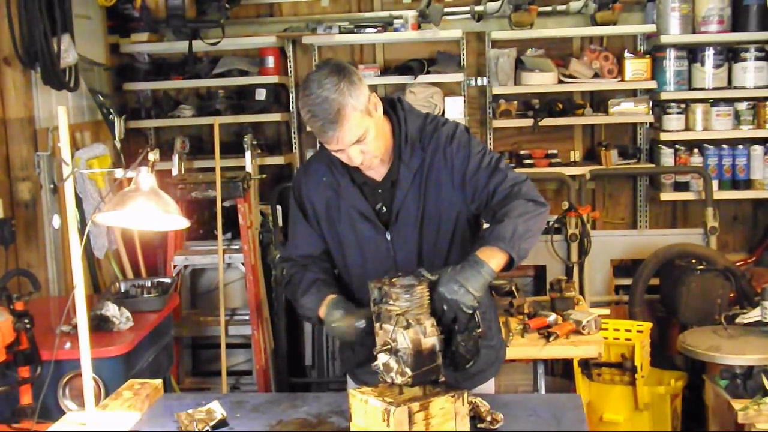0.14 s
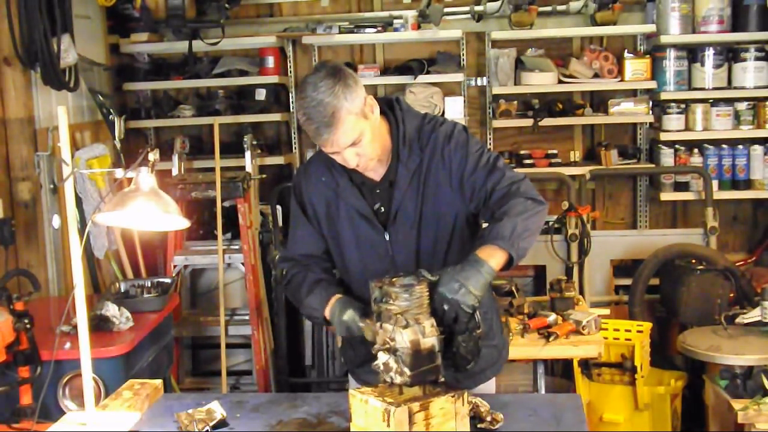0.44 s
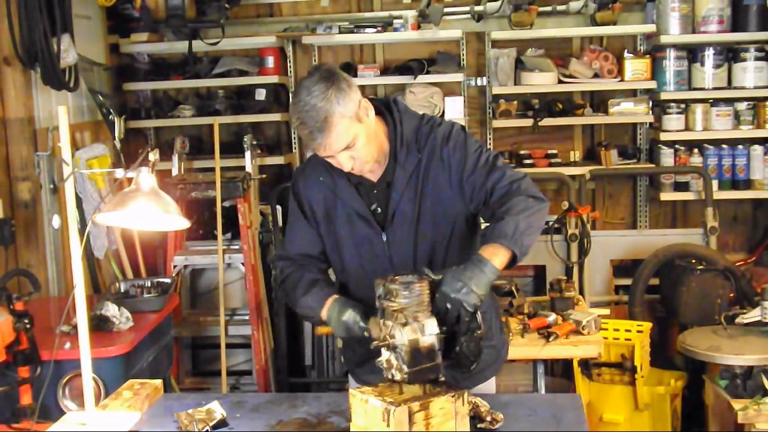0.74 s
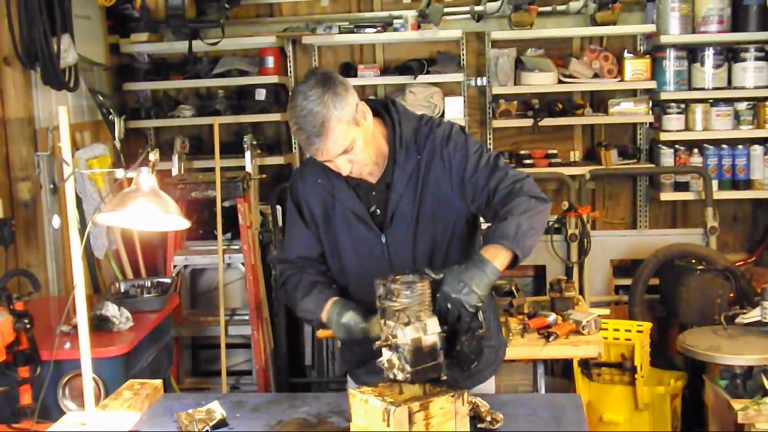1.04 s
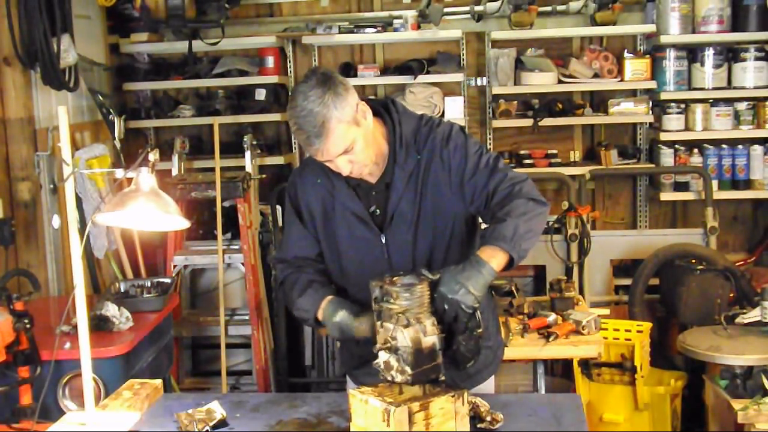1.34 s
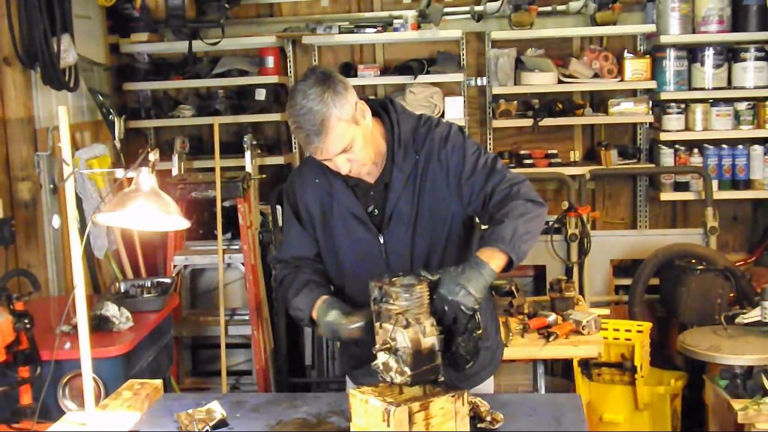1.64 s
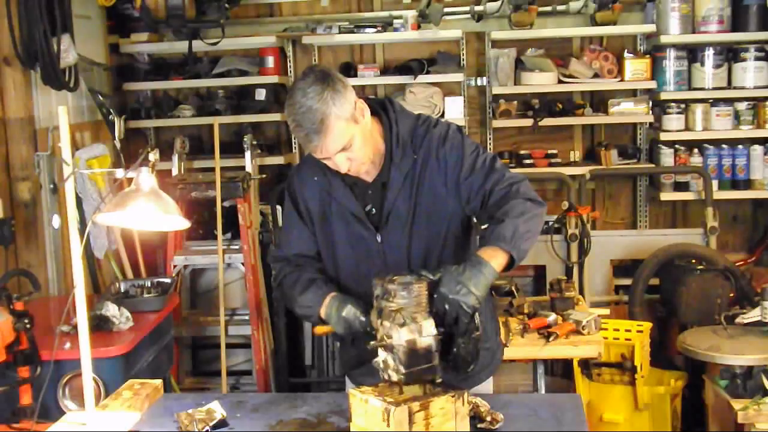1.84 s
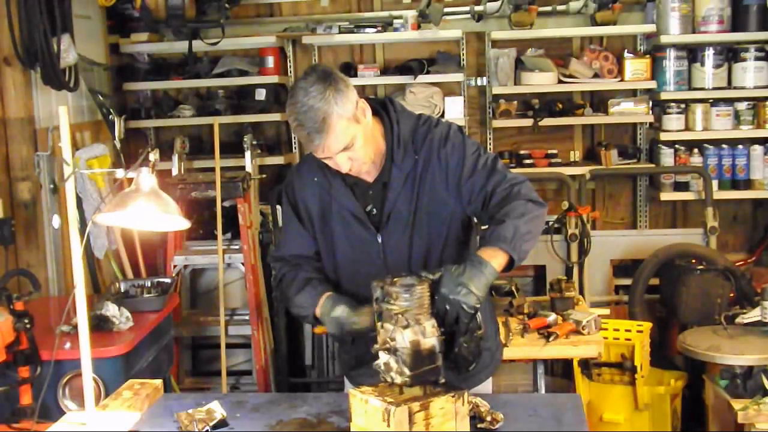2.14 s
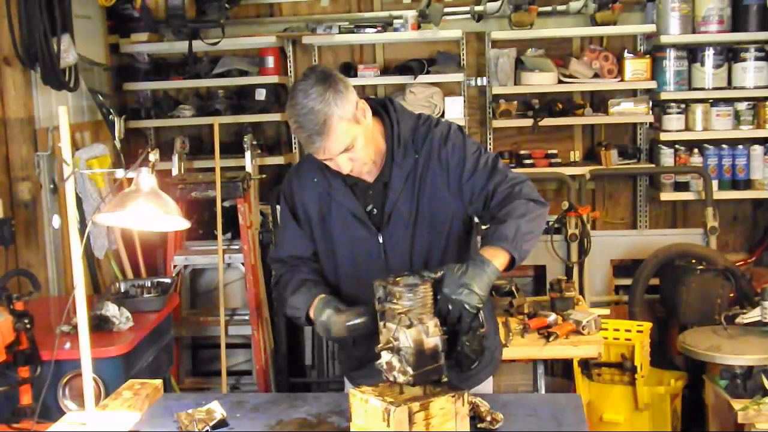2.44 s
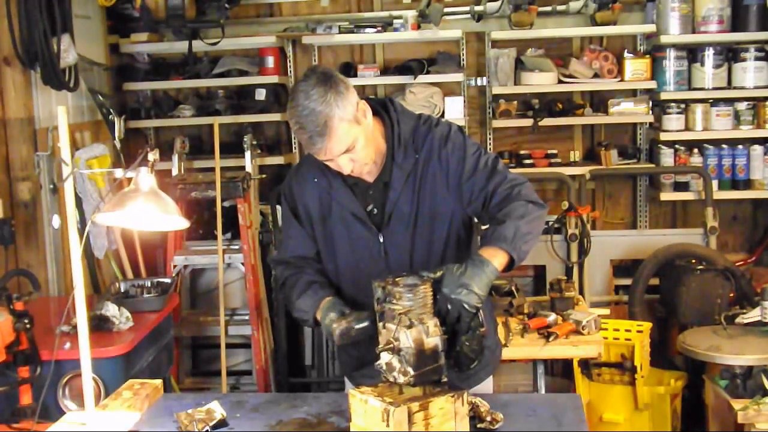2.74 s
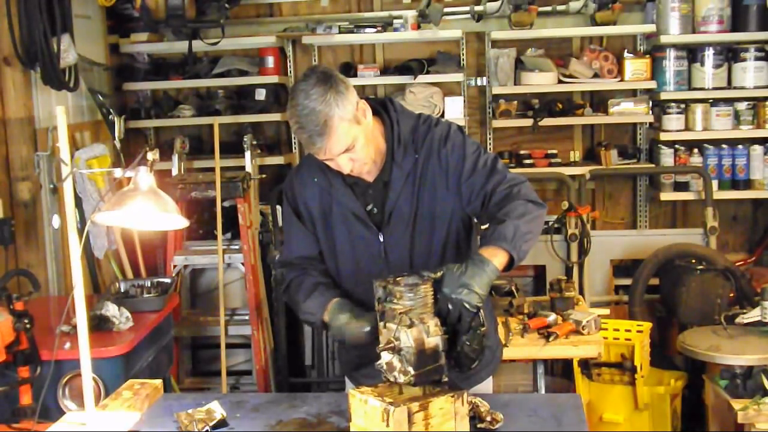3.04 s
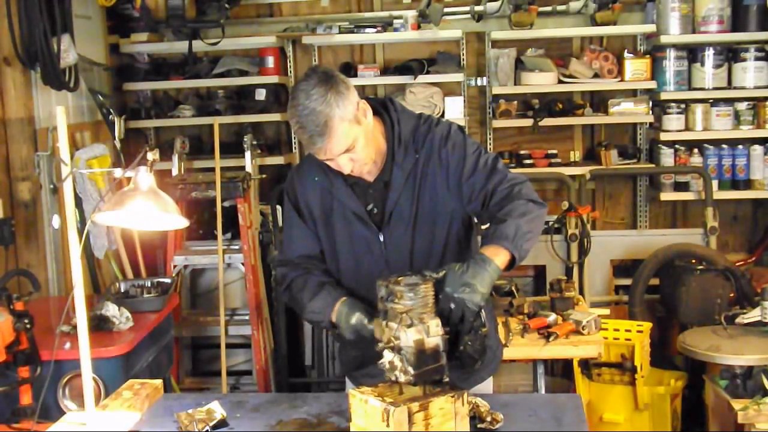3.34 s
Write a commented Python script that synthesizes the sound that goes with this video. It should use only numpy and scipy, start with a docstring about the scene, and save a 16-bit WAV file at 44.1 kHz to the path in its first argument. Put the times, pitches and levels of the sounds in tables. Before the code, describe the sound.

A rubber mallet strikes a cast engine block thirteen times at an even, rapid pace, each a short damped clonk with bench thump, in a cluttered workshop, heard by a slightly overloaded, narrow-band microphone.

```python
"""A rubber mallet knocks thirteen times, evenly, on a cast engine block held in a gloved hand on a wooden block.
Each blow sums short, damped sine modes into a clonk, with a burst of noise for the metal chatter.
Slower low noise is the workbench thump, and fainter bumps are the block rocking back onto its support.
A cluttered workshop answers with near echoes, a diffuse noise tail and lingering tones, over quiet room noise.
The loudest blows just overload the microphone, and the recorder keeps a narrow band."""
import sys
import numpy as np
from scipy import signal
from scipy.fft import rfft, irfft, next_fast_len
from scipy.io import wavfile

SR = 44100
rng = np.random.default_rng(int(sys.argv[2]) if len(sys.argv) > 2 else 0)


def int16_out(signal):
    """Quantize to a 16-bit WAV file."""
    q = np.round(np.clip(np.atleast_2d(signal).T, -1, 1) * 32767)
    wavfile.write(sys.argv[1], SR, q.astype(np.int16))


N = 154350


def amp(db):
    """Decibels to linear gain."""
    return 10 ** (np.asarray(db) / 20)


def along(points, hz):
    """Read (Hz, value) points at any frequency, on a log frequency axis."""
    point_hz, value = np.transpose(points)
    return np.interp(np.log(hz + 1), np.log(point_hz + 1), value)


def filtered(x, response):
    """Multiply the spectrum of x by a response of frequency, padded so that short echoes do not wrap round."""
    size = next_fast_len(len(x) + 4096, True)
    hz = np.fft.rfftfreq(size, 1 / SR)
    return irfft(rfft(x, size) * response(hz), size)[:len(x)]


def tilt(hz, bright_db):
    """Gain sloping by bright_db per octave from 600 Hz to 2400 Hz, level beyond; lower values sound duller."""
    octaves = np.log2(np.clip(hz / 600, 1, 4))
    return amp(bright_db * octaves)


def coloured(white, spectrum, bright_db=0):
    """White noise given a spectrum at the same power, then tilted."""
    every_hz = np.arange(SR // 2)
    norm = np.sqrt(np.mean(amp(along(spectrum, every_hz)) ** 2))
    return filtered(white, lambda hz: amp(along(spectrum, hz)) * tilt(hz, bright_db) / norm)


def noise(t):
    """White noise as long as t."""
    return rng.standard_normal(len(t))


def fade(t, t60):
    """Exponential decay that falls 60 dB in t60 seconds."""
    return np.exp(-np.log(1000) * t / t60)


def rise(t, rise_s):
    """Exponential approach to full level."""
    return 1 - np.exp(-t / rise_s)


def add(out, start_s, sound):
    """Mix a sound in at a time, cut off at the end of out."""
    i = round(start_s * SR)
    out[i:i + len(sound)] += sound[:max(len(out) - i, 0)]


def casting(t, bright_db, pitch):
    """The block's hand-damped modes, struck nearly alike each time, then again by the small bounces."""
    # Modes of the block. Each row: frequency in Hz at pitch ratio 1, relative level in dB, t60 in s.
    block_modes = [(349, -25.5, 0.082), (450, -15.5, 0.04), (585.2, 1.5, 0.029), (767, -4, 0.029),
                   (914.6, -16.5, 0.099), (948, -14, 0.072), (1112.4, -1, 0.021), (1243, -12, 0.032),
                   (1700, -11, 0.043), (1865, -13, 0.018), (1980, -29, 0.022), (2330, -20.5, .032),
                   (2615, -17.5, 0.023), (4514, -30, 0.021), (5620, -26.5, 0.0095)]
    # The part bounces in its seat. Each row: delay after the contact in s, level in dB.
    bounces = [(.00263, -6), (.00456, -15)]
    level_db, mode_scatter_db, contact_s = 3, 1.2, 0.0012
    bounce_scatter_s, bounce_above_hz = .00005, 1700

    hz, db, t60 = np.transpose(block_modes)[:, :, None]
    scatter_db = mode_scatter_db * rng.standard_normal(hz.shape)
    gain = amp(db + level_db + scatter_db) * tilt(hz, bright_db)
    modes = gain * fade(t, t60) * np.sin(2 * np.pi * hz * pitch * t)
    out = modes.sum(0) * rise(t, contact_s)
    # the bounces ring mainly the upper modes
    upper = np.sum(modes / (1 + (bounce_above_hz / hz) ** 4), 0)
    for delay_s, bounce_db in bounces:
        scattered_s = abs(delay_s + bounce_scatter_s * rng.standard_normal())
        add(out, scattered_s, amp(bounce_db) * upper)
    return out


def chatter(t, bright_db):
    """Metal grates on metal at the contact: coloured noise held a few milliseconds, then dying away."""
    # Spectrum of the grating crack. Each row: frequency in Hz, relative level in dB.
    crack = [(300, -33.5), (700, -12), (1300, 0), (2000, -0.5), (2750, -2.5), (3200, -6), (4500, -3.5),
             (6800, -11.5), (9000, -25.5)]
    level_db, rise_s, hold_s, t60_s = -23.5, 0.0039, 0.0041, 0.045
    shape = rise(t, rise_s) * fade(np.maximum(t - hold_s, 0), t60_s)
    return amp(level_db) * shape * coloured(noise(t), crack, bright_db)


def shelves(x):
    """A sound followed by its first echoes, each a delayed, weaker copy."""
    # Echoes from the bench top and near shelves. Each row: delay in s, level in dB.
    reflections = [(.0098, -32.5), (0.0159, -14.5), (0.0356, -28.5), (0.0537, -26)]

    def response(hz):
        return 1 + sum(amp(db) * np.exp(-2j * np.pi * hz * delay_s) for delay_s, db in reflections)
    return filtered(x, response)


def bench(t):
    """The bench takes the blow and rumbles: mostly low noise with a fast rise and a slow decay."""
    # Spectrum of the workbench. Each row: frequency in Hz, relative level in dB.
    rumble = [(20, -22.5), (35, -17), (48, 3), (65, 2), (80, -5), (105, -1), (150, -2), (190, -15),
              (255, -9.5), (400, -22), (900, -47.5), (2500, -100)]
    level_db, rise_s, t60_s = -28.5, 0.0028, 0.67
    return amp(level_db) * rise(t, rise_s) * fade(t, t60_s) * coloured(noise(t), rumble)


def rock(t):
    """A dull bump as the block settles: mostly low noise that rises fast and decays."""
    # Spectrum of the bump. Each row: frequency in Hz, relative level in dB.
    bump = [(30, -11), (50, 2), (80, -7.5), (150, -4), (200, -13.5), (300, -5.5), (550, -14.5),
            (800, -23.5), (1500, -27.5), (3000, -45.5), (7000, -82.5)]
    rise_s, t60_s = 0.005, .35
    return rise(t, rise_s) * fade(t, t60_s) * coloured(noise(t), bump)


def workshop(t, paths, bright_db):
    """A diffuse tail and lingering tones; the echo paths partly change from blow to blow."""
    # The workshop's answer. Each row: frequency in Hz, relative level in dB.
    answer = [(80, -23.5), (190, -14.5), (260, -2), (400, -5.5), (490, 1), (590, 3), (720, -3.5),
              (1000, -3), (1250, -11), (1700, -10.5), (2200, -19), (2700, -16.5), (3200, -27.5),
              (4500, -27), (5200, -31), (6800, -34.5)]
    # Its decay. Each row: frequency in Hz, t60 in s.
    decay = [(100, .8), (300, .66), (600, .52), (1200, .46), (2500, .45), (6500, .44)]
    # Tones that linger in bench, block and room. Each row: frequency in Hz, relative level in dB, t60 in s.
    tones = [(45.54, -34, 2.1), (67, -35, 1.5), (145.9, -39, 1.7), (560, -27, 0.47), (622.5, -27, 0.35),
             (898, -34.5, 0.26), (1318, -38.5, 0.5), (4470, -57.5, 0.35)]
    tail_db, rise_s = -18, .008
    change = .25  # share of the echo power that is new at each blow

    mixed_paths = np.sqrt(1 - change) * paths + np.sqrt(change) * noise(t)
    echoes = coloured(mixed_paths, answer, bright_db)
    # each frequency band decays at its own rate
    hz, frame_s, bands = signal.stft(echoes, SR, nperseg=512)
    decayed = bands * fade(frame_s, along(decay, hz)[:, None])
    tail = signal.istft(decayed, SR, nperseg=512)[1][:len(t)]
    standing = sum(amp(db) * fade(t, t60) * np.sin(2 * np.pi * (tone_hz * t + rng.random()))
                   for tone_hz, db, t60 in tones)
    return (amp(tail_db) * tail + standing) * (1 - np.exp(-(t / rise_s) ** 2))


def background(t):
    """Steady coloured noise of the quiet workshop, with more of the same fading away at the start."""
    # Spectrum of the background. Each row: frequency in Hz, relative level in dB.
    hush = [(20, -13), (33, -10), (60, 0), (150, -4), (550, -6), (1000, -18), (3000, -37), (7000, -44)]
    floor_db, linger_db, linger_t60_s = -48.5, -40.5, 0.48
    out = amp(floor_db) * coloured(rng.standard_normal(N), hush)
    add(out, 0, amp(linger_db) * fade(t, linger_t60_s) * coloured(noise(t), hush))
    return out


def scene():
    """The blows and the rocking block over the quiet of the workshop."""
    # Mallet blows. Each row: start in s, strength in dB, brightness in dB per octave, pitch ratio,
    # bench thump in dB.
    blows = [(0.1252, -3.5, -2, 0.97, 1.5), (0.3821, -5, -5, 0.97, -6), (0.6566, -1, -1.5, 1, 3),
             (0.9135, -1.5, -2.5, 0.98, 4.5), (1.181, 0.06, -3, 1, 1.5), (1.4419, -2.5, -3.5, 0.98, -3.5),
             (1.7208, -1.5, -2, .99, 1.5), (1.9805, -2.5, -1, 0.97, 6.5), (2.2504, -0.5, -0.5, 1, 1),
             (2.5135, -1.5, -0.5, 1, 0), (2.7706, -1, -2.24, 1.017, 2), (3.0358, -1, -1.77, 1.014, 1.5),
             (3.2973, 0.5, -2, 1.013, 5)]
    # The block rocks back onto its support between blows. Each row: start in s, level in dB.
    rocks = [(0.204, -21.5), (.8, -53), (1.019, -24), (1.264, -24), (1.331, -30.5), (1.503, -27.5),
             (1.61, -31), (1.839, -29), (2.859, -36)]
    tail_s, clonk_s = .7, .16
    t = np.arange(round(tail_s * SR)) / SR
    brief = t[t < clonk_s]
    paths = noise(t)  # the echo pattern that all blows share
    out = background(t)
    for start_s, db, bright_db, pitch, thump_db in blows:
        clonk = casting(brief, bright_db, pitch) + chatter(brief, bright_db)
        add(out, start_s, amp(db) * shelves(clonk))
        add(out, start_s, amp(db) * workshop(t, paths, bright_db))
        add(out, start_s, amp(thump_db) * bench(t))
    for start_s, db in rocks:
        add(out, start_s, amp(db) * rock(t))
    return out[None]


def record(dry):
    """The microphone rounds off the peaks; the recorder keeps a narrow band."""
    clip_top, clip_hardness = .97, 8  # full-scale ceiling, sharpness of the bend
    low_hz, top_hz = 40, 7100
    x = dry[0] / (1 + np.abs(dry[0] / clip_top) ** clip_hardness) ** (1 / clip_hardness)
    x = signal.sosfilt(signal.butter(2, low_hz, "highpass", fs=SR, output="sos"), x)
    # a very steep low-pass
    return filtered(x, lambda hz: 1 / np.sqrt(1 + (hz / top_hz) ** 100))[None]


dry = scene()
out = record(dry)
int16_out(out)
```